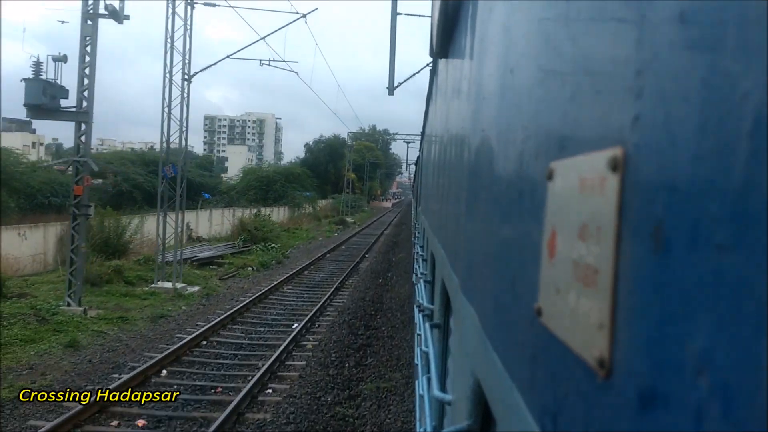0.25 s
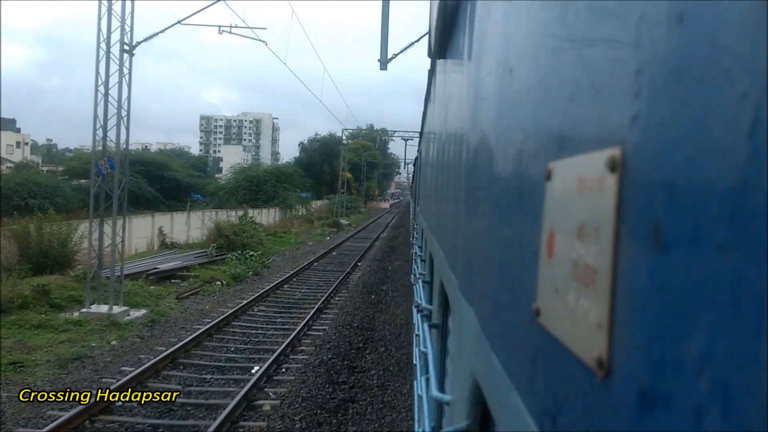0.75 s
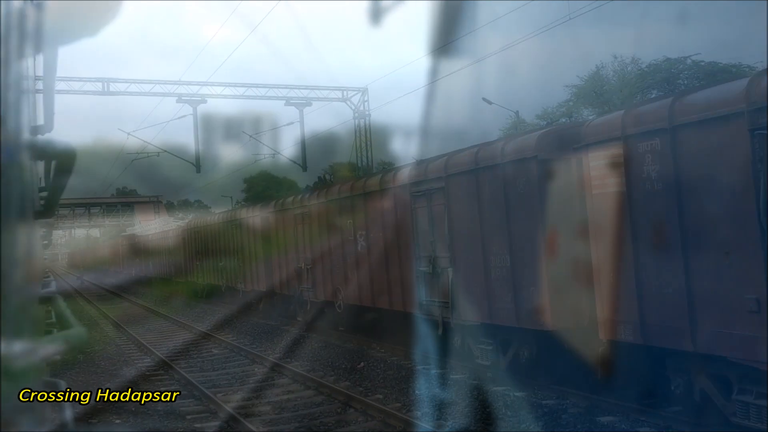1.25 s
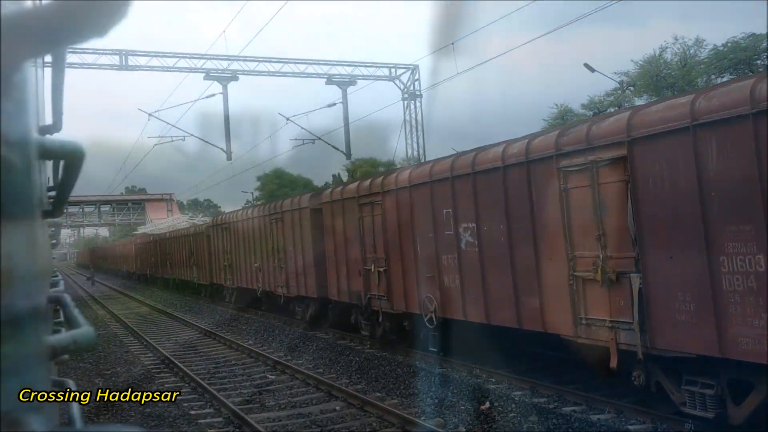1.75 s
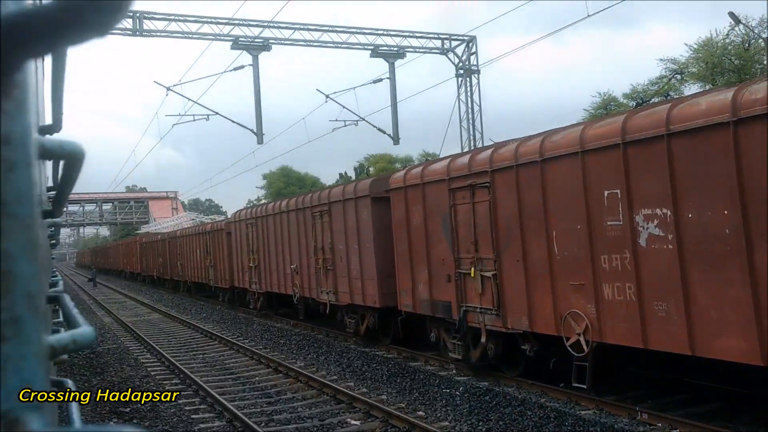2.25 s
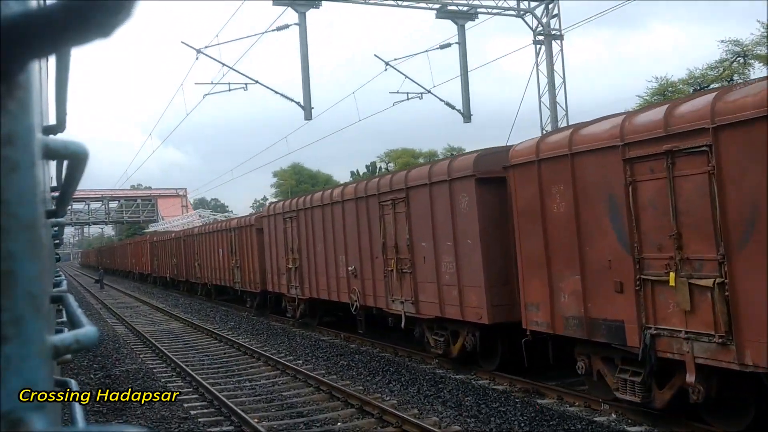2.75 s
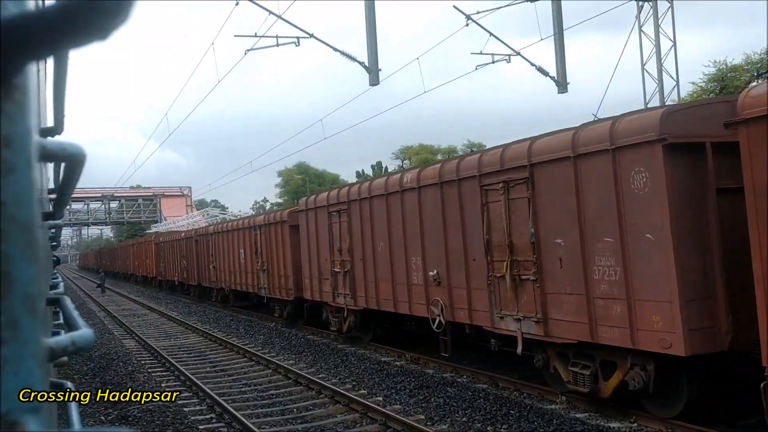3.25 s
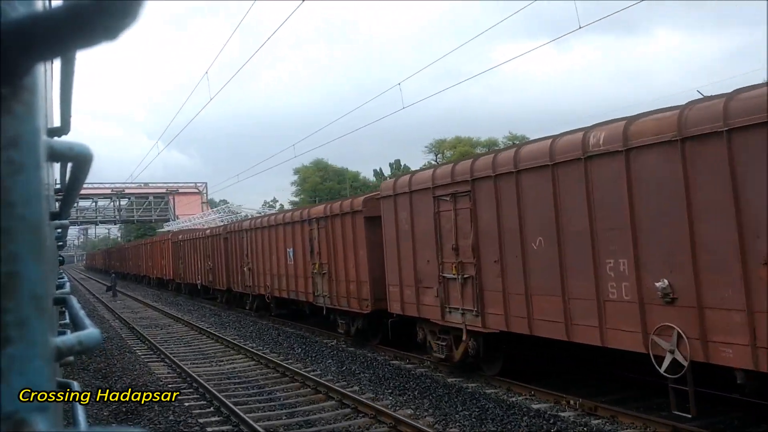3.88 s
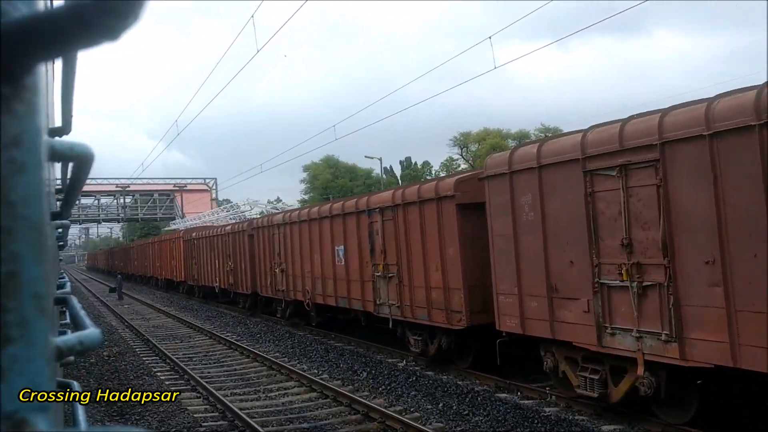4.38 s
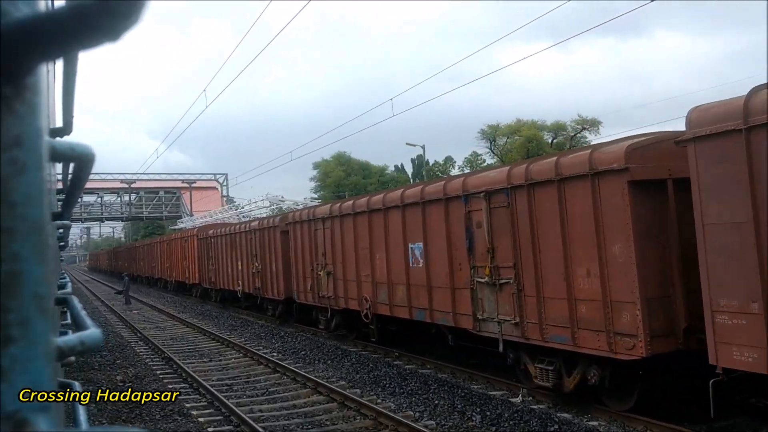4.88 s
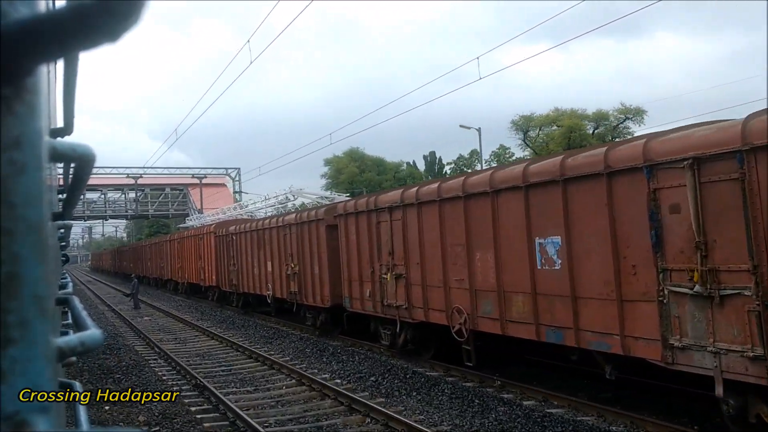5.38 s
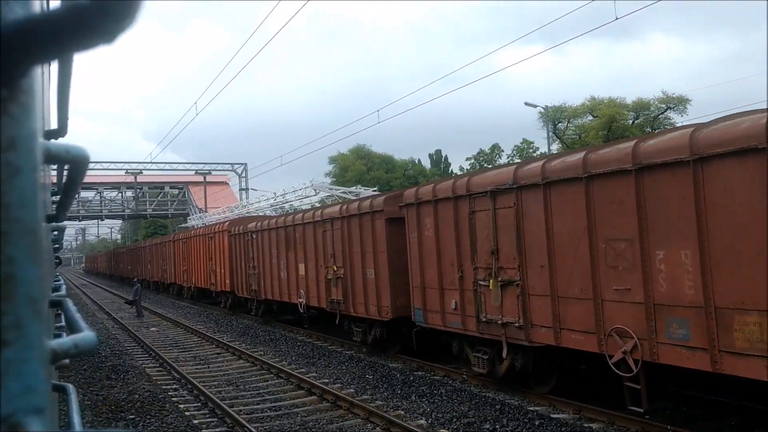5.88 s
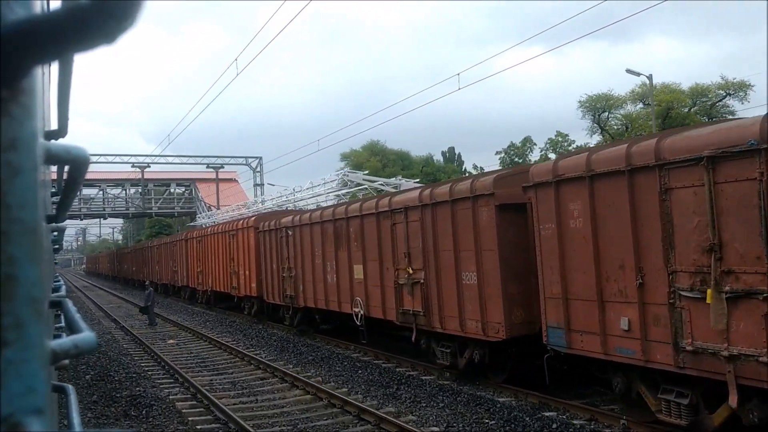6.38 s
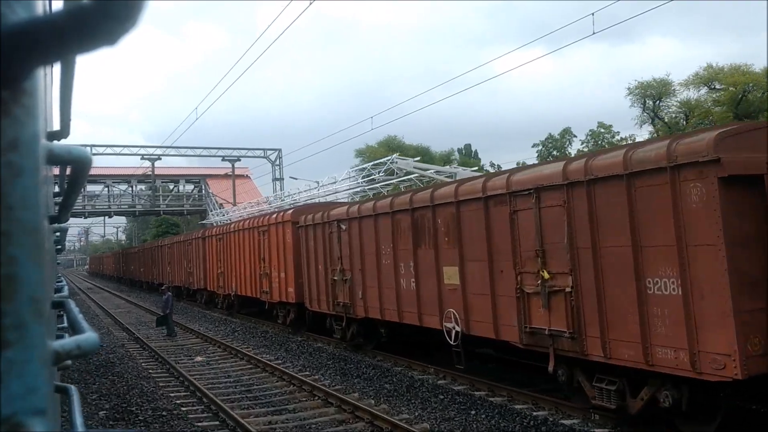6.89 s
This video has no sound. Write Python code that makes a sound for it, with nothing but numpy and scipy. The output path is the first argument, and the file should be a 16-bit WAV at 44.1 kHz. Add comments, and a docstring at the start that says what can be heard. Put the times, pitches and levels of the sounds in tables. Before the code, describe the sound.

From the open door of a moving passenger train, strong wind rumbles and pops against the microphone, mainly on the right at first, over a continuous steel wheel roar. A tiny high squeak comes early; before the middle the coach bumps dully. The wind then drops, leaving the wheels clearer, with scattered gusts to the end.

```python
"""A passenger train rolls past a line of freight wagons, heard from its open door.
From the start steel wheels roar (noise with resonant bands) and the slipstream buffets two microphone
ports (octave noise in gusts), with pops on the windward one (brief swings and noise bursts): mainly the
right until 2.7 s. A squeak glides up at 0.8 s; at 2.65 s the coach bumps (a decaying sine). The left port is
windward until 3.4 s and again from 6.3 s. Each port also enters the other channel, late and inverted."""
import sys
import numpy as np
from scipy import signal
from scipy.fft import rfft, irfft, next_fast_len
from scipy.io import wavfile
from scipy.ndimage import map_coordinates

SR = 44100
rng = np.random.default_rng(int(sys.argv[2]) if len(sys.argv) > 2 else 0)


def to_wav(sig):
    """Store sig (one row per channel, or 1-D mono) as 16-bit WAV at the path in sys.argv[1].

    Samples outside -1..1 are clipped; the rate is SR.
    """
    pcm = np.clip(np.atleast_2d(sig), -1, 1) * 32767
    pcm = np.round(pcm).astype(np.int16)
    wavfile.write(sys.argv[1], SR, pcm.T)  # frames by channels


N = 314433
TIME = np.arange(N) / SR
BINS_HZ = np.maximum(np.fft.rfftfreq(next_fast_len(N), 1 / SR), 1)

# strength of the slipstream, before the trim of each port: t/s, level/dB
SLIPSTREAM = [(0, -25), (0.5, -24), (1.3, -22), (1.68, -18.5), (2.08, -21.5), (2.33, -20), (2.41, -31.5),
              (3.0, -30.5), (3.25, -25), (3.6, -28.5), (3.98, -28), (4.06, -32.5), (4.7, -29), (5.1, -24.5),
              (6.1, -25.5), (6.38, -29), (6.65, -22.5), (7.13, -32.5)]
# side that the slipstream comes from: t/s, left port minus right port/dB
WIND_SIDE = [(0, 1), (0.4, -6.5), (2.3, -3.5), (2.85, 1), (4.4, -1.5), (6.1, -0.5), (7.13, 2.5)]


def from_db(db):
    """A level L in decibels is an amplitude ratio of 10^(L/20)."""
    return 10 ** (np.asarray(db) / 20)


def rms_one(x):
    """Normalization of the mean square to unity."""
    return x / np.sqrt(np.mean(x ** 2) + 1e-20)


def in_time(rows):
    """Linear interpolation of each column of a time table, sample by sample."""
    s, *columns = np.transpose(rows)
    return [np.interp(TIME, s, column) for column in columns]


def at_hz(points, hz):
    """Interpolation of a spectrum on a logarithmic frequency axis."""
    knots, level = np.transpose(points)
    return np.interp(np.log(hz), np.log(knots), level)


def drift(rate_hz):
    """Low-pass filtering of white noise: a double pole at rate_hz leaves a smooth random signal of unit rms."""
    step = 20  # samples between the computed points
    pole = np.exp(-2 * np.pi * rate_hz * step / SR)
    settling = 4000
    noise = rng.standard_normal(N // step + settling + 2)
    slow = signal.lfilter([1], [1, -2 * pole, pole ** 2], noise)[settling:]
    return np.interp(np.arange(N) / step, np.arange(len(slow)), rms_one(slow))


def octave_noise(colour_db):
    """Spectral shaping: coloured noise of unit rms, split into overlapping octaves [(centre/Hz, band)]."""
    size = next_fast_len(N)
    spectrum = rfft(rng.standard_normal(size)) * from_db(colour_db)
    spectrum = spectrum / np.std(irfft(spectrum, size))
    centres_hz = 40 * 2. ** np.arange(10)
    bands = []
    for hz, triangle in zip(centres_hz, np.eye(len(centres_hz))):
        share = np.interp(np.log(BINS_HZ), np.log(centres_hz), triangle)
        bands.append((hz, irfft(spectrum * share, size)[:N]))
    return bands


def dull(x, corner_hz):
    """First-order low-pass: above the corner the level falls by 6 dB per octave."""
    return signal.sosfilt(signal.butter(1, corner_hz, fs=SR, output="sos"), x)


def overload(x, top):
    """Soft saturation: a hyperbolic tangent rounds off the largest swings below the limit."""
    return top * np.tanh(x / top)


def squeak(width_hz):
    """Stick-slip friction of rubbing steel: a gliding tone, roughened by random amplitude modulation."""
    # short rising squeak: t/s, f/Hz, level/dB
    glide = [(0.78, 4520, -75), (0.797, 4750, -58), (0.804, 5980, -58), (0.826, 6020, -49),
             (0.84, 6100, -85)]
    hz, level_db = in_time(glide)
    tone = np.sin(2 * np.pi * np.cumsum(hz) / SR)
    return from_db(level_db) * rms_one(drift(width_hz) * tone)


def bump(attack_s):
    """Impulsive excitation of a damped mode: the coach jolts once and its body rings low and briefly."""
    at_s, level_db, mode_hz, t60_s = 2.648, -9.5, 175, 0.045  # level of the decay, before the attack
    t = np.maximum(TIME - at_s, 0)
    decay = from_db(level_db - 60 * np.minimum(t / t60_s, 2))
    attack = (1 - np.exp(-t / attack_s)) ** 2
    return -decay * attack * np.sin(2 * np.pi * mode_hz * t)


def wheel_roar(flicker_db, judder_db):
    """Roughness excitation of steel on steel: a broad roar with narrow wheel resonances, and bogie judder."""
    # rolling noise, before the resonances: f/Hz, level per Hz/dB
    colour = [(30, -2), (160, 10), (420, 8.5), (750, -3.5), (1200, 0.5), (1580, -5), (2100, 0),
              (3600, -1.5), (4700, -5), (5600, -9.5), (7000, -17), (9200, -18.5), (12300, -26.5),
              (14500, -36.5)]
    # wheel resonances standing out of the roar: f/Hz, width/Hz, lift/dB
    modes = [(1130, 35, 4), (2160, 70, 3), (2660, 25, 3), (2930, 60, 3), (3640, 50, 3), (4600, 35, 4.5),
             (4875, 30, 3.5)]
    colour_db = at_hz(colour, BINS_HZ)
    for hz, width_hz, lift_db in modes:
        colour_db = colour_db + lift_db / (1 + (2 * (BINS_HZ - hz) / width_hz) ** 2)
    roar = np.zeros(N)
    for _, band in octave_noise(colour_db):
        roar += band * from_db(flicker_db * drift(7.6))
    return roar * from_db(judder_db * drift(9.7))


def wind_on_ports():
    """Energy division: the slipstream with its buffets is shared between left and right port; levels in dB."""
    # brief buffets and lulls in the slipstream: t/s, change of level/dB
    buffets = [(0.08, -2), (0.24, 0.5), (0.37, 2), (0.475, -2), (0.55, 2.5), (0.6, -0.5), (0.7, 2),
               (0.9, -3), (1.06, -1.5), (1.12, -5.5), (1.27, -3.5), (1.42, -0.5), (1.55, -0.5), (1.64, 1.5),
               (1.75, -0.5), (1.85, -6.5), (1.935, 5), (2.04, -1.5), (2.17, -0.5), (2.29, 1.5), (2.63, 9.5),
               (2.73, 8.5), (2.86, 6), (3.34, -4), (3.42, 0.5), (3.85, 4.5), (4.41, 1.5), (4.58, 7),
               (4.78, 4.5), (4.93, 2.5), (5.19, 2), (5.28, -11), (5.37, 1), (5.599, 4), (5.7, -1.5),
               (6.07, 2.5), (6.17, -1), (6.691, -5.5), (6.87, -2.5), (7.0, 8.5), (7.12, 1.5)]
    spread_s = 0.021  # standard deviation of a buffet's bell shape
    level_db, = in_time(SLIPSTREAM)
    side_db, = in_time(WIND_SIDE)
    for s, lift_db in buffets:
        level_db = level_db + lift_db * np.exp(-.5 * ((TIME - s) / spread_s) ** 2)
    right_db = level_db - 10 * np.log10(1 + from_db(side_db) ** 2)
    return right_db + side_db, right_db


def buffeting(gust_db, colour, swell_db, lump_db, flutter_db, brighten, usual_db):
    """Turbulence comes in lumps: its small, high eddies flutter faster and grow most in a hard push."""
    surge_db = overload(swell_db * drift(16) + lump_db * drift(47), top=5.5)
    push_db = gust_db + surge_db
    # brightening is neutral at the usual push
    eddies_db = brighten * (push_db - usual_db) + flutter_db * np.tanh(drift(88))
    out = np.zeros(N)
    for hz, band in octave_noise(at_hz(colour, BINS_HZ)):
        smallness = np.clip(np.log2(hz / 160), -.5, 2)
        out += band * from_db(push_db + smallness * eddies_db)
    return out


def hollow(x, hz, width_hz, share):
    """Cavity resonance: a pocket of air in front of the port lends the wind a short ring."""
    return x + share * signal.lfilter(*signal.iirpeak(hz, hz / width_hz, fs=SR), x)


def stray_eddies(count):
    """Poisson process: lesser eddies at random moments, their strength following the slipstream."""
    per_s, above_slipstream_db = 45, 0.5
    middle_hz, spread_octaves, crack, length_s = 260, 0.32, .03, 0.0046
    times = np.cumsum(rng.exponential(1, count)) / per_s
    pitch = np.clip(rng.standard_normal(count), -2, 2)
    strength_db = np.interp(times, *np.transpose(SLIPSTREAM)) + above_slipstream_db
    hz = middle_hz * 2 ** (spread_octaves * pitch)
    return [(s, db, f, crack, length_s) for s, db, f in zip(times, strength_db, hz) if s < TIME[-1]]


def windward(s):
    """Exposure: the port with the higher wind level faces the slipstream at this moment."""
    return "left" if np.interp(s, *np.transpose(WIND_SIDE)) > 0 else "right"


def swing(t, hz):
    """Pressure doublet: one smooth swing each way, of height 1, with its energy around hz."""
    phase = 2 * np.pi * hz * t
    shape = phase * (1 + phase ** 2 / 4) ** -3
    return shape / np.abs(shape).max()


def pops(eddies, side, core_s, breadth, crack_hz, crack_s, low_hz, ring_q):
    """Vortex passage over a port: a brief eddy is one swing with a sharp crack, a longer one a flutter."""
    out, t = np.zeros(N), TIME[:SR // 20] - .025
    snap = rms_one(np.cos(2 * np.pi * crack_hz * t) * np.exp(-.5 * (t / crack_s) ** 2))
    per_ms = np.sqrt(.001 * SR / len(t))  # gives unit rms the energy of 1 ms
    for s, strength_db, hz, crack, length_s in eddies:
        if windward(s) != side:
            continue
        core = rms_one(swing(t, hz / breadth)) + crack * snap
        burst = rng.standard_normal(len(t)) * np.exp(-(2 * t / length_s) ** 4)
        whirl = rms_one(np.sin(2 * np.pi * hz * t) * np.exp(-2 * (hz * t) ** 2))
        low_flutter = rms_one(signal.fftconvolve(burst, whirl, "same"))
        sharp_flutter = rms_one(signal.fftconvolve(burst, snap, "same"))
        flutter = low_flutter + crack * sharp_flutter
        pop = (core_s * core + length_s * flutter) / np.hypot(core_s, length_s)
        start = max(round((s + t[0]) * SR), 0)
        out[start:start + len(t)] += from_db(strength_db) * per_ms * pop[:N - start]
    # second-order high-pass
    w = 2 * np.pi * low_hz
    return signal.lfilter(*signal.bilinear([1, 0, 0], [1, w / ring_q, w * w], SR), out + 1e-18)


def widen(ports, bass_spared):
    """Delayed cross-feed: each channel is its port minus the late other one; bass crosses a little less."""
    lags_s = 0.00044, 24.77 / SR  # of the left and the right port on the way across
    late = np.array([map_coordinates(port, [np.arange(N) - lag_s * SR], order=5)
                     for port, lag_s in zip(ports, lags_s)])
    late = late - bass_spared * dull(late, corner_hz=600)
    return ports - late[::-1]


def scene():
    """Superposition: wind on both ports, wheels on the right, their dull scattered sound around, a bump."""
    # wheels on rail, before the trims of direct and scattered sound: t/s, level/dB
    rolling = [(0, -51), (0.35, -47.5), (0.56, -44), (0.69, -48.5), (0.9, -44), (1.6, -42), (2.68, -41),
               (2.81, -44), (3.22, -39), (3.55, -43), (3.99, -39.0), (4.02, -48), (4.45, -43.5), (4.9, -37),
               (5.27, -40), (5.52, -37), (5.67, -42), (5.81, -38), (5.87, -45.5), (6.17, -41.5),
               (6.34, -45.5), (6.55, -44), (7.13, -44)]
    # turbulence on the left and on the right port, relative: f/Hz, level per Hz/dB
    left_colour = [(20, -12), (45, -11), (70, -12), (100, 2.5), (150, 0.5), (210, 0.5), (310, -13.5),
                   (450, -17), (680, -14), (1000, -45.5), (1600, -44.5), (2600, -48), (8000, -92)]
    right_colour = [(20, -11), (45, -6), (70, 3), (115, 1), (170, 2.5), (270, -2.5), (360, -15.5),
                    (500, -11), (730, -26), (1000, -32), (1600, -32.5), (2600, -42), (8000, -88)]
    # loudest eddies, strength before trim as if packed into 1 ms:
    # t/s, level/dB, nominal f/Hz, share of sharp crack, length/s
    loud_eddies = [(0.042, -24, 470, 0.35, 0.0017), (0.058, -20, 344, 0.1, 0.004),
                   (0.106, -15, 150, 0, 0.0024), (0.303, -5.5, 213, 0, 0.014),
                   (0.325, -14, 238.0, 0, 0.0045), (0.3825, -13.5, 376.0, 0, 0.0034),
                   (0.389, -11.5, 439.0, 0, 0.005), (0.423, -13, 138, 0.1, 0.0046),
                   (0.444, -9, 157, 0, 0.002), (0.501, -2.5, 172, 0.01, 0.0076),
                   (0.507, -17, 490, 0, 0.0033), (0.539, -10, 382, 0.04, 0.0034),
                   (0.561, -11.5, 398, 0.1, 0.0044), (0.622, -5, 165, 0.02, 0.0071),
                   (0.632, -8.5, 220.0, 0.08, 0.0017), (0.665, -13, 256.0, 0.1, 0.009),
                   (0.731, -14, 340, 0, 0.0048), (0.75, -12, 131, 0, 0.0034),
                   (0.83, -17.5, 349.0, 0.17, 0.002), (0.93, -10.5, 275, 0.1, 0.003),
                   (0.993, -10, 320, 0.07, 0.0043), (1.005, -9.5, 350, 0.14, 0.012),
                   (1.023, -7, 238.0, 0.05, 0.0032), (1.092, -5, 221, 0.08, 0.0048),
                   (1.1845, -11.5, 423, 0, 0.0023), (1.191, -15, 396, 0.06, 0.0027),
                   (1.224, -20, 440, 0.1, 0.001), (1.231, -5, 222, 0, 0.0035),
                   (1.307, -15, 219, 0.12, 0.0024), (1.399, -15, 330, 0.1, 0.011),
                   (1.453, -11, 340, 0.33, 0.0059), (1.471, -6.5, 440, 0, 0.0012),
                   (1.5044, -12.5, 347, 0.05, 0.0159), (1.556, -14.5, 450, 0.1, 0.0039),
                   (1.591, -5, 183, 0.18, 0.0017), (1.6275, -12, 480, 0.2, 0.0024),
                   (1.6356, -13, 406.0, 0.2, 0.0042), (1.651, -10.5, 490, 0.4, 0.0032),
                   (1.6586, -18, 552.0, 0.7, 0.0064), (1.678, -3, 260, 0.04, 0.0028),
                   (1.75, -19, 470, 0, 0.0032), (1.798, -13, 230, 0.03, 0.0087),
                   (1.911, -19.5, 323.0, 0.45, 0.002), (1.924, -16, 470, 0.3, 0.0012),
                   (1.936, -16, 404, 0.1, 0.007), (1.951, -7, 260, 0.1, 0.0031),
                   (2.095, -19, 350, 0.08, 0.003), (2.161, -4, 167, 0, 0.0027),
                   (2.201, -7.5, 258, 0.03, 0.0055), (2.21, -19, 450, 0, 0.0016),
                   (2.244, -10.5, 416, 0.08, 0.0085), (2.2979, -14, 149, 0.3, 0.0056),
                   (2.322, -9, 256.0, 0.02, 0.0055), (2.3464, -11.5, 323.0, 0.13, 0.0047),
                   (2.516, -21, 165, 0.2, 0.0022), (2.652, -20, 420, 0.5, 0.016),
                   (2.712, -12, 143, 0.16, 0.0018), (2.762, -11, 300, 0.3, 0.00075),
                   (2.997, -11, 173, 0, 0.0018), (3.104, -21, 410, 0.22, 0.0052),
                   (3.1574, -19.5, 423, 0.24, 0.0082), (3.2197, -14, 380, 0.2, 0.0013),
                   (3.2535, -9, 238.0, 0, 0.0068), (3.3715, -8, 256.0, 0, 0.0017),
                   (3.391, -7, 210, 0, 0.0014), (3.496, -12, 164, 0, 0.003), (3.68, -18, 210, 0.1, 0.00092),
                   (3.772, -17, 220, 0.2, 0.0023), (3.82, -17, 220.0, 0.15, 0.0027),
                   (3.908, -13.5, 220, 0.17, 0.0035), (3.957, -12, 130, 0.03, 0.003),
                   (3.987, -9, 230, 0, 0.0037), (3.996, -5, 290, 0.2, 0.0021),
                   (4.005, -20, 490, 0.2, 0.0019), (4.176, -24, 240, 0.34, 0.0018),
                   (4.394, -12, 249, 0.22, 0.006), (4.417, -20, 240, 0.12, 0.0033),
                   (4.568, -16, 152, 0.2, 0.0022), (4.61, -13, 149, 0, 0.0035), (4.794, -15, 170, 0, 0.006),
                   (4.915, -12, 180, 0, 0.002), (5.025, -17.5, 240, 0.24, 0.0024),
                   (5.092, -20, 330, 0.1, 0.003), (5.144, -9, 397, 0, 0.0025),
                   (5.199, -12, 158, 0.03, 0.0038), (5.623, -14, 168, 0.06, 0.0025),
                   (5.665, -9.5, 298, 0.02, 0.0067), (5.73, -20, 420, 0.1, 0.0012),
                   (5.824, -18, 323.0, 0.1, 0.0011), (5.842, -8.5, 305, 0, 0.00037),
                   (5.886, -16, 600, 0.05, 0.0005), (5.906, -15, 220.0, 0.3, 0.001),
                   (5.938, -13, 150, 0, 0.006), (5.96, -20, 400, 0.0, 0.0009),
                   (6.008, -16, 260, 0.03, 0.0031), (6.041, -15, 286, 0.56, 0.0084),
                   (6.1084, -8, 188, 0, 0.0042), (6.1143, -10.5, 280, 0.0, 0.001),
                   (6.228, -16.5, 400, 0, 0.00063), (6.282, -10, 175, 0.07, 0.00091),
                   (6.308, -9, 270, 0.05, 0.00094), (6.326, -32, 500, 0.5, 0.00084),
                   (6.421, -15, 250, 0.1, 0.005), (6.46, -17, 230, 0.1, 0.0015),
                   (6.4865, -18.5, 400, 0.03, 0.0009), (6.528, -27, 695.0, 0.6, 0.011),
                   (6.549, -13, 170, 0.02, 0.0044), (6.607, -20, 400, 0.15, 0.001),
                   (6.613, -13, 277.0, 0, 0.0016), (6.632, -9.5, 230, 0.08, 0.0027),
                   (6.6685, -3.5, 200, 0.1, 0.0018), (6.717, -11.5, 200, 0.22, 0.0008),
                   (6.723, -28, 380, 0.5, 0.003), (6.754, -28, 330, 0.03, 0.001),
                   (6.77, -11, 170, 0.04, 0.0013), (6.776, -25, 430, 0, 0.0011),
                   (6.825, -13, 182, 0.04, 0.0024), (6.8332, -16.5, 480, 0.1, 0.0006),
                   (6.895, -18, 277.0, 0, 0.001), (6.91, -15, 220, 0.08, 0.00092),
                   (6.964, -12, 161, 0, 0.0017), (6.993, -23, 330, 0.4, 0.001),
                   (6.999, -7, 268, 0.02, 0.0016), (7.0097, -21, 303, 0.2, 0.0012),
                   (7.114, -18, 350, 0, 0.0027), (7.125, -7, 221, 0.05, 0.0026)]

    roll_gain = from_db(in_time(rolling)[0])
    wheels = from_db(3.0) * roll_gain * wheel_roar(flicker_db=1.07, judder_db=1.24)
    wheels += squeak(width_hz=200)
    scattered = np.array([wheel_roar(flicker_db=4.0, judder_db=1.5) for _ in range(2)])
    scattered = from_db(-0.5) * roll_gain * scattered
    scattered = dull(dull(scattered, corner_hz=2500), corner_hz=2500)

    left_db, right_db = wind_on_ports()
    eddies = loud_eddies + stray_eddies(count=450)
    left = from_db(0.16) * buffeting(left_db, left_colour, swell_db=2.5, lump_db=2.0,
                                     flutter_db=1.6, brighten=0.2, usual_db=-17.5)
    left += from_db(-1.5) * pops(eddies, "left", core_s=0.0045, breadth=1.15, crack_hz=1010,
                                 crack_s=0.00052, low_hz=124, ring_q=1.0)
    right = from_db(-3.5) * buffeting(right_db, right_colour, swell_db=0.03, lump_db=1.0,
                                      flutter_db=0.0, brighten=0.19, usual_db=-29)
    right += from_db(-1.0) * pops(eddies, "right", core_s=0.0029, breadth=1.154, crack_hz=990,
                                  crack_s=0.00018, low_hz=127.5, ring_q=1.1)
    right = hollow(right, hz=449, width_hz=30, share=0.54)

    wind = overload(np.array([left, right]), top=0.25)
    ports = wind + np.array([np.zeros(N), wheels])
    return widen(ports, bass_spared=0.0077) + scattered + bump(attack_s=0.0021)


def record(dry):
    """Band limitation: an elliptic low-pass cuts the top steeply, after short linear fades at both ends."""
    ends = np.clip(np.minimum(TIME, TIME[-1] - TIME) / .006, 0, 1)
    low_pass = signal.ellip(10, .1, 80, 15300, fs=SR, output="sos")  # order, ripple/dB, stop/dB, f/Hz
    return signal.sosfilt(low_pass, dry * ends)


dry = scene()
out = record(dry)
to_wav(out)
```